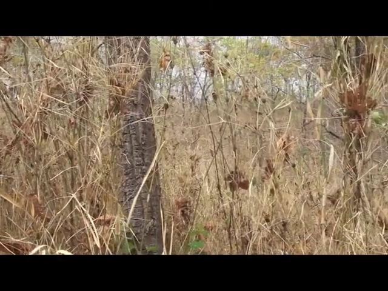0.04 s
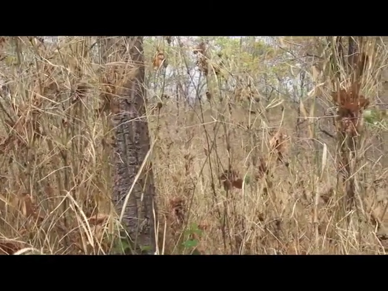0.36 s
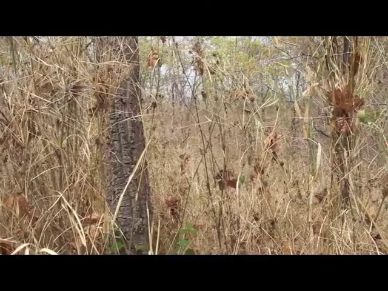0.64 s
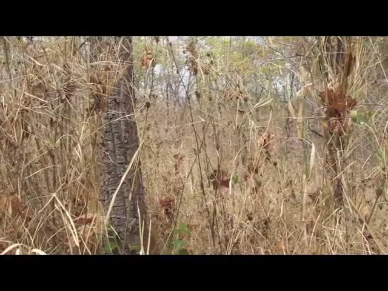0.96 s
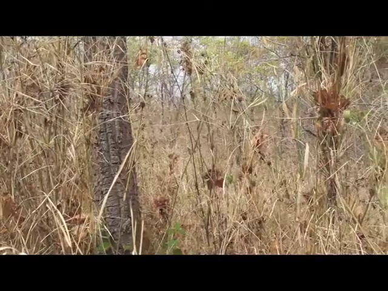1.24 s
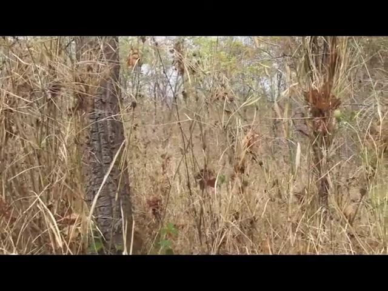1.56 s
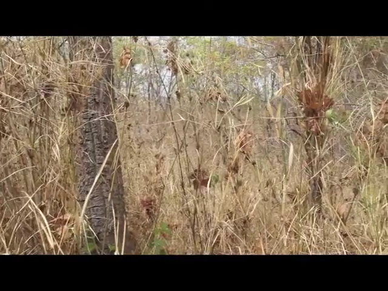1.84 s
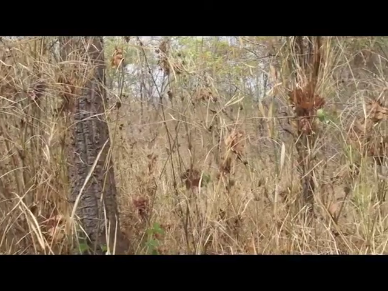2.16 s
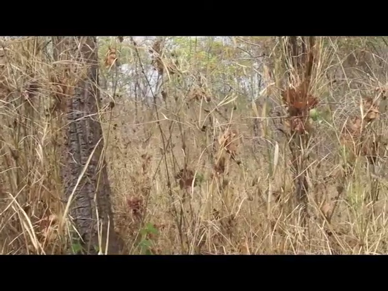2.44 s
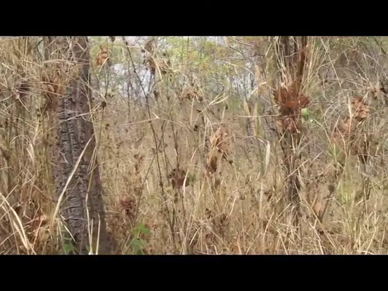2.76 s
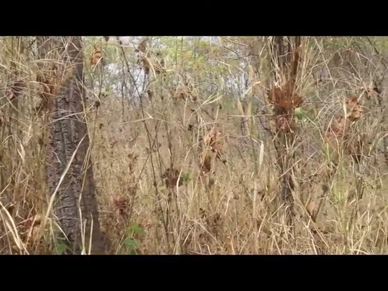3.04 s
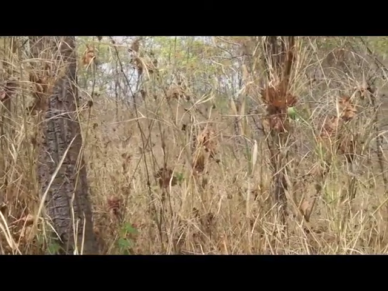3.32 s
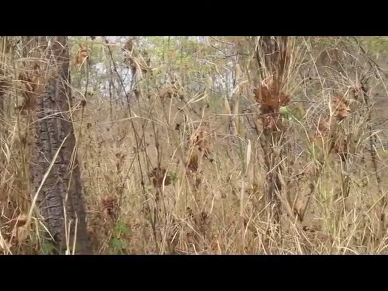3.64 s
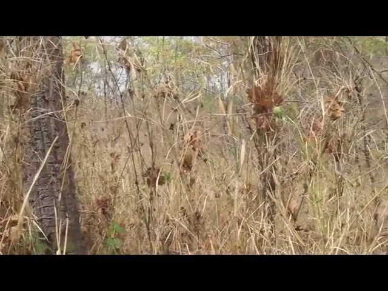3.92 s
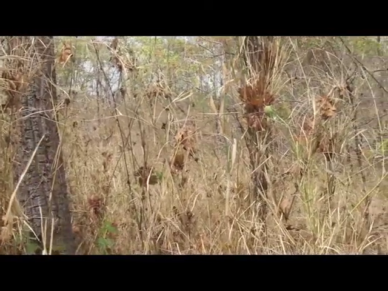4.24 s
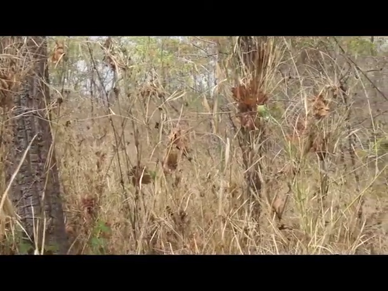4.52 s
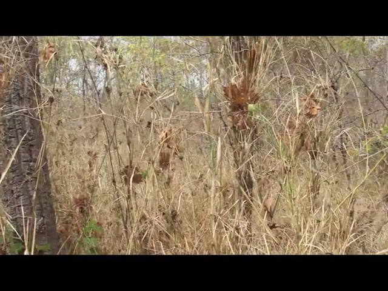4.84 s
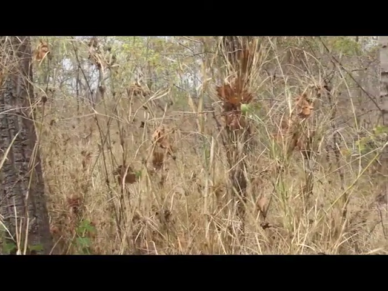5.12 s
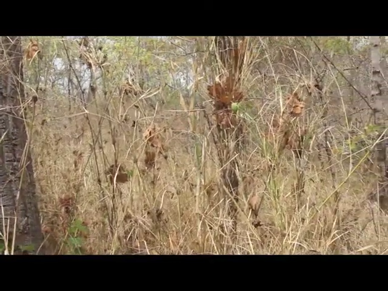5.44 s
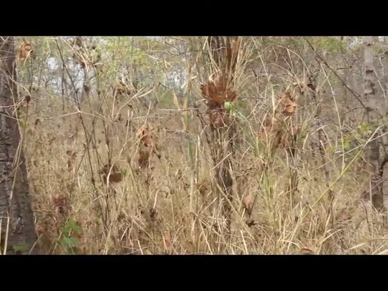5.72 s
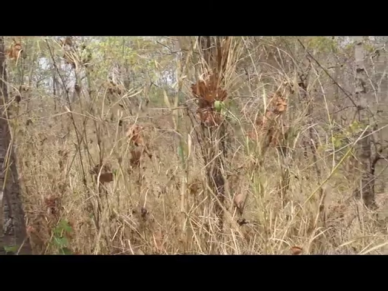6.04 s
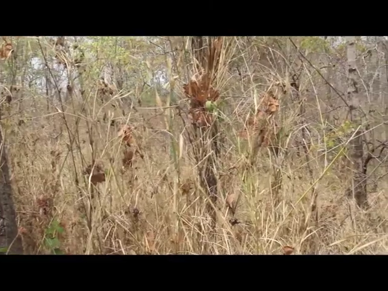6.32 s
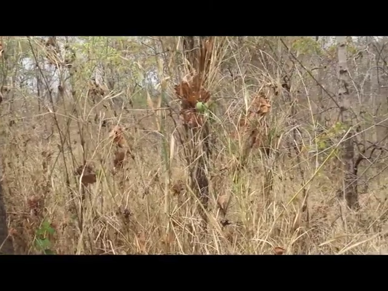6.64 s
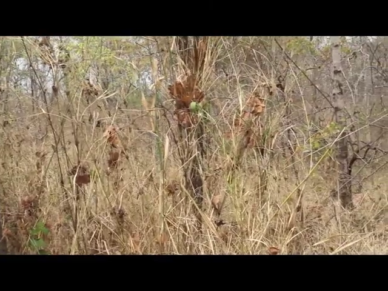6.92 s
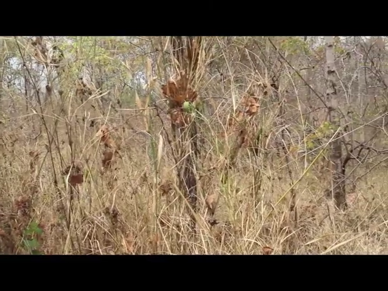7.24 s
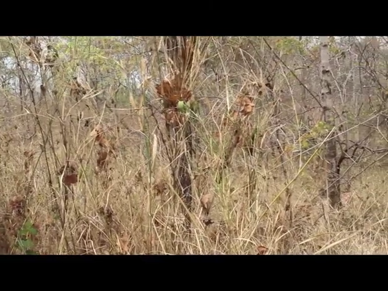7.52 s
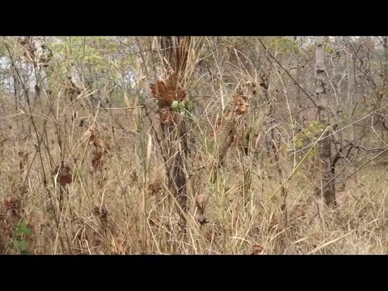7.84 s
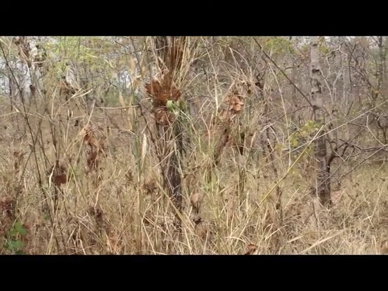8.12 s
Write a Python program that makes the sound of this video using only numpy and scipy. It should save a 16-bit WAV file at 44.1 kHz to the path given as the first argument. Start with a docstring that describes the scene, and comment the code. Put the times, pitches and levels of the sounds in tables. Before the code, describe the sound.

Cicadas buzz in dry woodland over a distant, shrill chorus that drones and gently swells throughout. One cicada close to the microphone throbs about sixteen times a second, high and metallic, growing louder in the first second. It stutters between about 1 and 1.7 seconds. Around 3 seconds its tone shifts and the pulses run together, building to a climax before it stops abruptly at 4.6 seconds. A second cicada farther off swells in with a softer, even buzz, fades by 6.5 seconds and continues very quietly. A third gives short rasps near 4.6, 4.9, 6.7, 7.3, 7.7 and 8.2 seconds. A distant one whines in three long calls, roughly 0 to 1, 2 to 4 and 5 to 6.5 seconds. A faint rumble of air and a barely audible, very high electronic whistle run underneath.

```python
"""Dry woodland, cicadas at several distances from one microphone. Each buzzes by buckling ribbed drums.
Close by, one throbs about sixteen times a second, stutters, tightens its drums to a climax and stops.
Farther off a second then holds a softer buzz and a third gives short rasps; a distant one whines.
Behind them a far chorus drones on, its voices sagging in pitch, over a faint rumble of air
and a thin electronic whistle."""
import sys
import numpy as np
from scipy import signal
from scipy.fft import rfft, irfft, next_fast_len
from scipy.io import wavfile
from scipy.ndimage import map_coordinates

SR = 44100
rng = np.random.default_rng(int(sys.argv[2]) if len(sys.argv) > 2 else 0)


def dump_mix(stems):
    """Bounce the given channels to the path in sys.argv[1] as a 16-bit WAV at rate SR."""
    frames = np.atleast_2d(stems).T  # one column per channel
    limited = np.clip(frames, -1, 1)  # hard clip at full scale
    pcm = np.round(limited * 32767).astype(np.int16)
    wavfile.write(sys.argv[1], SR, pcm)


N = 369116


# resonances of the near cicada's body, with slack and with tight drums: f/Hz, level/dB
SLACK_BODY = [(3000, -12), (5100, -13), (6700, -4.5), (7900, -7), (8450, -4), (9000, -7.5), (9700, -3),
              (10450, -6), (10950, 2), (11950, -2), (12600, -2), (13550, -9), (14250, -0.5), (15400, -13)]
TIGHT_BODY = [(2200, -51), (3800, -8.5), (4850, -13), (5700, -6), (6200, -8), (6900, -2), (7600, -6.5),
              (8200, -4), (9700, -15), (10400, -10), (11400, -2), (13000, -9), (14500, -7.5), (15700, -19)]

def near_cicada(tighten_s=3.08, rest_tension=.094, stop_s=4.555, split_hz=7800):
    """Close to the microphone: tighter drums shift the resonances and strengthen the abdomen's ring."""
    t = clock()
    tension = rest_tension + (1 - rest_tension) / (1 + np.exp((tighten_s - t) / .22))  # 0 slack, 1 tight
    power = throbbing(tension)
    drum = tymbal(rate_hz=242 * (1 + .08 * wobble(30)), jitter_s=.0006, gap_s=.0009, uneven_db=1.5, ribs=4)
    buzz = echoes(scattered(drum, t60=.015, share=.65), spread_s=.015, echo_db=-5, count=30)
    slack = amp(1.56) * np.sqrt(1 - tension) * coloured(buzz, SLACK_BODY)
    tight = amp(3) * np.sqrt(tension) * coloured(buzz, TIGHT_BODY)
    body = slack + tight
    low = filtered(body, lambda hz: 1 / (1 + (hz / split_hz) ** 16))
    ring = ringing(rng.standard_normal(N), hz=5030 + 490 * tension, width_hz=400)
    abdomen = low + amp(-6 + 2 * tension) * ring
    # the abdomen keeps sounding between throbs, so the treble throbs most deeply
    window = SR // 16
    mean_power = signal.oaconvolve(power, np.ones(window) / window)[:N]
    steady_share = .83 - .58 * tension
    lasting_power = np.abs(steady_share * mean_power + (1 - steady_share) * power)
    song = np.sqrt(power) * (body - low) + np.sqrt(lasting_power) * abdomen
    return song * amp(-700 * np.maximum(t - stop_s, 0))  # breaks off at 700 dB a second


# pace of the near cicada's throbs: t/s, f/Hz
THROB_PACE = [(0, 16.0), (0.5, 15.06), (0.7, 17.08), (1.6, 17.4), (2.2, 16.43), (2.9, 14.91), (3.45, 15.37),
              (3.65, 18.14), (3.9, 15.48), (4.5, 16.68)]
# its effort at the crest of a throb: t/s, relative level/dB
THROB_EFFORT = [(0, -41), (0.2, -40.5), (0.4, -35.5), (0.75, -33.5), (1.1, -34), (1.5, -37), (1.75, -35),
                (2.15, -34), (3.2, -36), (3.7, -33), (4, -31), (4.4, -30.5), (4.5, -32), (4.57, -40)]
# its stutters, in which every other throb weakens: centre t/s, half length/s, loss/dB
STUTTERS = [(1.34, .42, 16), (3.51, 0.25, 2)]

def throbbing(tension, first_s=.034, attack_s=.013, hold_s=.012):
    """Power of the near song: every throb opens, holds and dies away under the next ones."""
    t, pace = clock(), curve(THROB_PACE)
    turns = np.cumsum(pace) / SR - pace[0] * first_s
    number = np.arange(int(turns[-1]))
    starts = np.interp(number, turns, t)
    loss_db = np.zeros(len(starts))
    for centre, half, db in STUTTERS:
        every_other = (number - int(turns[int(centre * SR)])) % 2
        loss_db += db * np.exp(-((starts - centre) / half) ** 2) * every_other
    power, age = np.zeros(N + SR), t[:SR // 4]
    opening = np.minimum(age / attack_s, 1)
    for at, db in zip((starts * SR).astype(int), loss_db):
        decay_s = .02 + .019 * tension[at]  # tight drums let the throbs run together
        dying = np.exp(-np.maximum(age - attack_s - hold_s, 0) / decay_s)
        power[at:at + len(age)] += amp(-db) ** 2 * opening * dying
    return power[:N] * amp(curve(THROB_EFFORT) + .25 * wobble(12)) ** 2


# the second cicada's calls, one full and one soft: start t/s, end t/s, level/dB
SECOND_CALLS = [(4.3, 6.58, -38.3), (6.5, 9.2, -53)]
# resonances of its body: f/Hz, level/dB
SECOND_BODY = [(2500, -14), (4400, -1.5), (5000, -4), (5800, -16), (7000, -5), (8100, -15.5), (9000, -6.5),
               (10000, -10), (11300, -4), (12700, -5.5), (14500, -7), (15600, -19)]

def second_cicada():
    """Farther from the microphone: two drums take turns in an even buzz."""
    drum = tymbal(rate_hz=322 * (1 - .003 * clock()), jitter_s=6e-6, gap_s=.00155, uneven_db=2, ribs=2)
    buzz = echoes(scattered(drum, t60=.08, share=.55), spread_s=.03, echo_db=-4, count=40)
    gain = calls(SECOND_CALLS, rise_s=1, fall_s=.78) * amp(.4 * wobble(25))
    return gain * coloured(buzz, SECOND_BODY)


# the third cicada's rasps: centre t/s, relative level/dB, half length/s
RASPS = [(4.63, -39, .025), (4.93, -38, .05), (6.66, -38, 0.024), (7.283, -36.5, .026), (7.72, -38.5, .045),
         (8.16, -37, .045)]
# resonances of its body: f/Hz, level/dB
RASP_BODY = [(2500, -27), (4000, 5.5), (6500, -3), (9000, -3), (11000, -2), (12600, 4.5), (14500, -1),
             (15600, -7)]

def rasping_cicada():
    """Among the stems: loosely timed clicks swell into short rasps."""
    gain = sum(amp(db) * np.exp(-((clock() - centre) / half) ** 2 / 2) for centre, db, half in RASPS)
    drum = tymbal(rate_hz=260, jitter_s=.0004, gap_s=.001, uneven_db=4.5, ribs=3)
    return amp(-.5) * gain * coloured(scattered(drum, t60=.075, share=.7), RASP_BODY)


# long calls of the whining cicada: start t/s, end t/s, relative level/dB
WHINES = [(.05, 1.2, -43), (2.1, 3.9, -44), (4.85, 6.4, -46)]

def whining_cicada():
    """Deeper in the wood: distance leaves only one narrow resonance of calls that swell and fade."""
    rate_hz = 105 * (1 - .006 * clock() + .002 * wobble(12))
    drum = tymbal(rate_hz, jitter_s=.00003, gap_s=.001, uneven_db=2, ribs=1)
    buzz = echoes(scattered(drum, t60=.2, share=.55), spread_s=.05, echo_db=-3, count=50)
    return amp(-.5) * calls(WHINES, rise_s=.41, fall_s=.45) * ringing(buzz, hz=3646, width_hz=155)


# swells of the chorus's deep and middle voices: centre t/s, half length/s, rise/dB
DEEP_SWELLS = [(.15, .55, 2), (2.2, 0.5, 3.5), (3.9, .15, 1.5), (5.25, .4, 3.5), (8.4, .45, 3)]
MIDDLE_SWELLS = [(.5, 0.38, 3.3), (3.05, 0.66, 3), (4.98, 0.28, 3.5), (6.1, 0.61, 1.5), (7.6, 0.78, 2.5)]
# loudness of its shrill voices: t/s, level/dB
SHRILL_LEVEL = [(0, -34.5), (1.6, -34.5), (3, -32), (4.6, -34.5), (6.2, -37), (6.85, -39.2), (7.15, -38.5),
                (8.37, -38)]
# spectrum of each group at the microphone: f/Hz, level/dB
DEEP_SPECTRUM = [(700, -45.5), (1300, -15.5), (1800, -9.5), (2200, 1.5), (2700, 2), (3200, 1), (4200, -38)]
MIDDLE_SPECTRUM = [(1900, -41.5), (2600, -4.5), (3000, -2), (3400, 1.5), (4000, -0.5), (4700, -10),
                   (5500, -14.5), (7500, -19.5)]
SHRILL_SPECTRUM = [(3000, -23), (4400, -2.5), (5500, -1), (6600, -1.5), (7400, -4.5), (8200, -9.5),
                   (9200, -9.5), (10500, -7), (11500, -8), (13000, -7), (14300, -12), (15500, -17)]

def far_chorus():
    """Far back in the trees: deep, middle and shrill groups of cicadas each swell on their own."""
    deep = far_voices(rate_hz=230, sag_per_s=.05, wash=.5, count=20)
    middle = far_voices(rate_hz=290, sag_per_s=.025, wash=.58, count=26)
    shrill = far_voices(rate_hz=340, sag_per_s=.025, wash=.72, count=30)
    return (amp(-50 + swells(DEEP_SWELLS)) * coloured(deep, DEEP_SPECTRUM)
            + amp(-44 + swells(MIDDLE_SWELLS)) * coloured(middle, MIDDLE_SPECTRUM)
            + amp(curve(SHRILL_LEVEL) + .31 * wobble(22)) * coloured(shrill, SHRILL_SPECTRUM))


def far_voices(rate_hz, sag_per_s, wash, count):
    """Overlapping buzzes whose click rate sags as they run, in the wash of the whole wood."""
    voices = np.zeros(N)
    for k, (when, length, pitch, size) in enumerate(rng.random((count, 4))):
        length_s, click_hz = 1 + 1.5 * length, rate_hz * (.75 + .5 * pitch)
        centre_s = (k + when) / count * (N / SR + 1) - .5
        age = np.arange(int(length_s * click_hz)) / click_hz
        times = centre_s - length_s / 2 + age + sag_per_s * age ** 2 / 2
        sizes = amp(8 * size) * np.sin(np.pi * age / length_s)
        voices += clicks(times, sizes * (times > 0) * (times < N / SR))
    # many paths smear each click but keep the harmonics sharp
    paths = rng.standard_normal(SR // 10) * amp(-60 * np.arange(SR // 10) / SR / .12)
    response = rfft(paths, SR // 2)
    smear = irfft(response / np.abs(response))[:SR // 10]
    voices = signal.oaconvolve(voices, smear)[:N]
    return np.sqrt(1 - wash) * unit(voices) + np.sqrt(wash) * rng.standard_normal(N)


# spectral density of the air's rumble: f/Hz, relative level/dB
AIR_SPECTRUM = [(13, -44), (22, -23), (59, -4.5), (118, -5.5), (235, -1), (311, -1), (399, -4), (511, -1),
                (689, -5), (780, -3.5), (931, -5), (1500, -2.5), (1950, 0), (3300, -120)]

def air(hollow_hz=523, width_hz=42):
    """Under everything: a faint rumble of air, and a narrow hollow band that flutters."""
    f, db = np.transpose(AIR_SPECTRUM)
    rumble = filtered(rng.standard_normal(N), lambda hz: amp(np.interp(np.log(hz + 1), np.log(f), db)))
    hollow = filtered(rng.standard_normal(N), lambda hz: np.exp(-((hz - hollow_hz) / width_hz) ** 2 / 2))
    rumble_db = -55.5 + .48 * wobble(15)
    flutter = 1 + np.tanh(wobble(18))
    return amp(rumble_db) * unit(rumble) + amp(-68.5) * unit(hollow * flutter)


def tymbal(rate_hz, jitter_s, gap_s, uneven_db, ribs):
    """A cicada's drum: at each pull of the muscle its ribs buckle one after another, gap_s apart."""
    turns = np.cumsum(rate_hz * (1 + .001 * wobble(5))) / SR
    pulls = np.interp(np.arange(1, int(turns[-1])), turns, clock())
    times = pulls[:, None] + gap_s * np.arange(ribs) + jitter_s * rng.standard_normal((len(pulls), ribs))
    sizes = amp(uneven_db * rng.standard_normal(times.shape) - 2 * np.arange(ribs))
    return unit(clicks(times.ravel(), sizes.ravel()))


def scattered(x, t60, share):
    """Stems and trunks turn a share of the clicks' energy into a diffuse, dying wash."""
    keep = amp(-120 / (t60 * SR))
    energy = np.abs(signal.lfilter([1 - keep], [1, -keep], x ** 2))
    return np.sqrt(1 - share) * x + np.sqrt(share * energy) * rng.standard_normal(N)


def echoes(x, spread_s, echo_db, count):
    """Weak copies off nearby stems comb the spectrum into fine metallic peaks."""
    delay, size = rng.random(count), rng.standard_normal(count)
    taps = np.bincount((delay * spread_s * SR).astype(int) + 8, amp(echo_db) * size / np.linalg.norm(size))
    taps[0] = 1  # the direct path
    return signal.oaconvolve(x, taps / np.linalg.norm(taps))[:N]


def ringing(x, hz, width_hz):
    """x through one resonance whose frequency may move, at rms 1."""
    turn = np.exp(2j * np.pi * np.cumsum(hz * np.ones(N)) / SR)
    return unit(np.real(signal.lfilter(*signal.butter(2, width_hz / SR), x / turn) * turn))


def calls(rows, rise_s, fall_s):
    """Gain of a run of calls: each rises, holds and fades."""
    t, gain = clock(), np.zeros(N)
    for start, end, db in rows:
        ramp = np.clip(np.minimum((t - start) / rise_s, (end - t) / fall_s), 0, 1)
        gain += amp(db) * np.sin(np.pi / 2 * ramp)
    return gain


def swells(rows):
    """The dB that bell-shaped swells add to a resting level."""
    return sum(db * np.exp(-((clock() - centre) / half) ** 2) for centre, half, db in rows)


def clicks(times, sizes):
    """Impulses, each shared between its two nearest samples."""
    at = np.clip(times * SR, 0, N - 2)
    i = at.astype(int)
    return np.bincount(i, sizes * (1 - at + i), N) + np.bincount(i + 1, sizes * (at - i), N)


def coloured(x, points, size=2048):
    """x through a causal filter with the (f/Hz, level/dB) points, at rms 1."""
    f, db = np.transpose(points)
    log_hz = np.log(np.fft.rfftfreq(size, 1 / SR) + 1)
    gain = amp(np.interp(log_hz, np.log(np.r_[f[0] / 2, f]), np.r_[db[0] - 20, db]))
    cepstrum = irfft(np.log(gain))
    cepstrum[1:size // 2] *= 2  # folded for minimum phase
    cepstrum[size // 2 + 1:] = 0
    return unit(signal.oaconvolve(x, irfft(np.exp(rfft(cepstrum))))[:N])


def filtered(x, response):
    """x with its spectrum scaled by a response of frequency."""
    size = next_fast_len(N + SR // 2)
    return irfft(rfft(x, size) * response(np.fft.rfftfreq(size, 1 / SR)), size)[:N]


def wobble(rate):
    """A smooth random curve, rate knots a second."""
    return map_coordinates(rng.standard_normal(int(N * rate / SR) + 4), [np.arange(N) * rate / SR])


def curve(rows):
    """Straight lines through (t/s, value) rows, one value per sample."""
    return np.interp(clock(), *np.transpose(rows))


def clock():
    """The time of every sample."""
    return np.arange(N) / SR


def amp(db):
    """Decibels to gain."""
    return 10 ** (np.asarray(db) / 20)


def unit(x):
    """x scaled to rms 1."""
    return x / np.sqrt(np.mean(x ** 2) + 1e-20)


def scene():
    """The whole wood reaches one microphone, heard alike in both ears."""
    mono = near_cicada() + second_cicada() + rasping_cicada() + whining_cicada() + far_chorus() + air()
    return np.array([mono, mono])


def record(dry, whistle_hz=15682, top_hz=15780):
    """At the microphone: a faint electronic whistle joins in, and nothing above the band limit is kept."""
    whistle = amp(-66) * unit(np.sin(2 * np.pi * whistle_hz * clock()))
    return np.array([filtered(side + whistle, lambda hz: hz < top_hz) for side in dry])


dry = scene()
out = record(dry)
dump_mix(out)
```